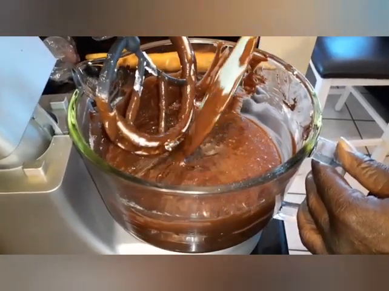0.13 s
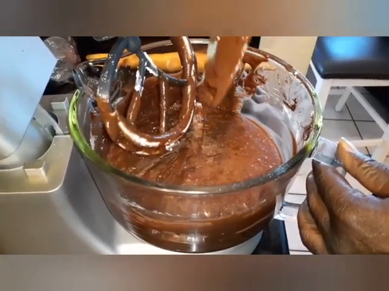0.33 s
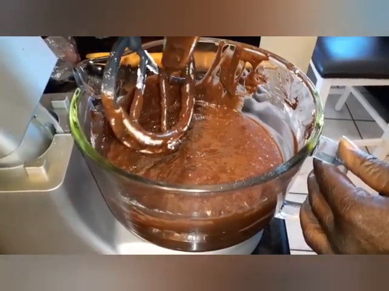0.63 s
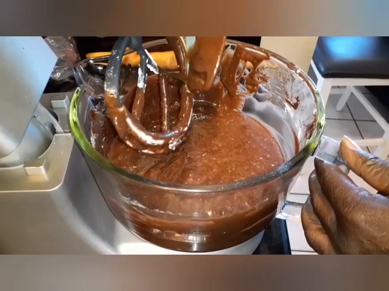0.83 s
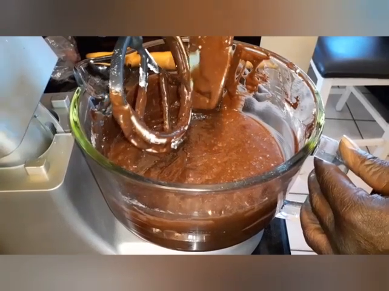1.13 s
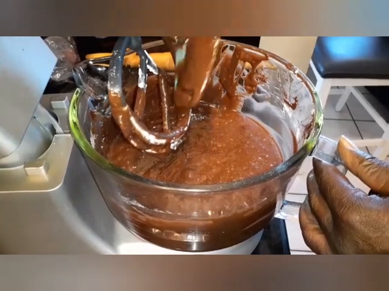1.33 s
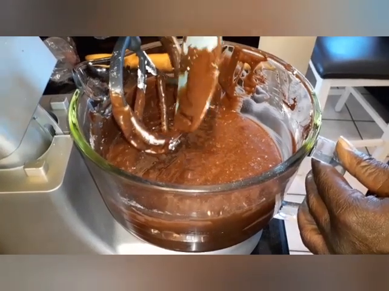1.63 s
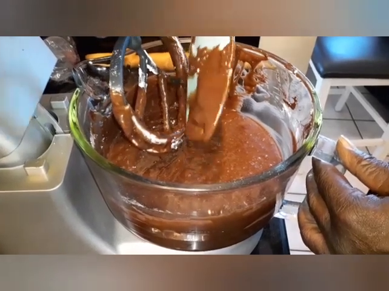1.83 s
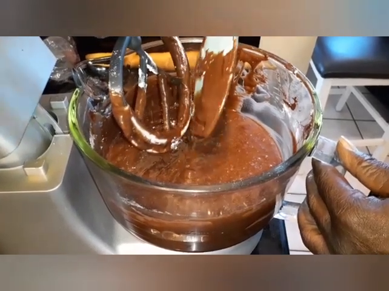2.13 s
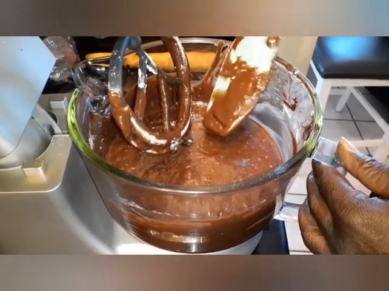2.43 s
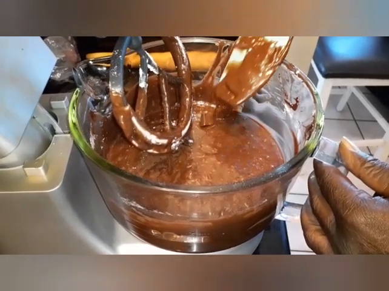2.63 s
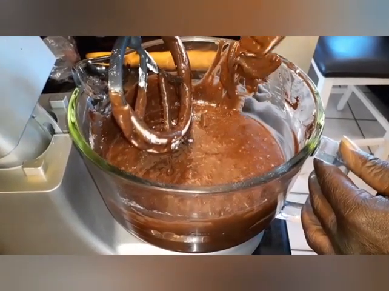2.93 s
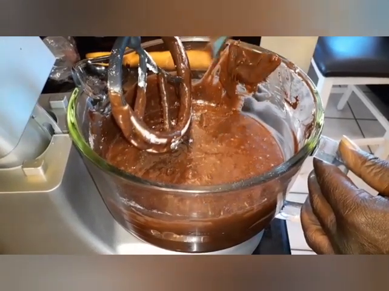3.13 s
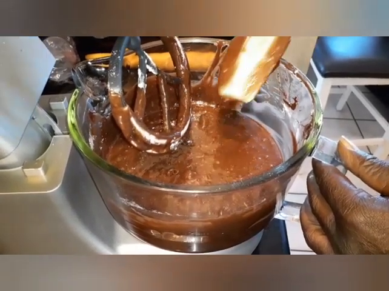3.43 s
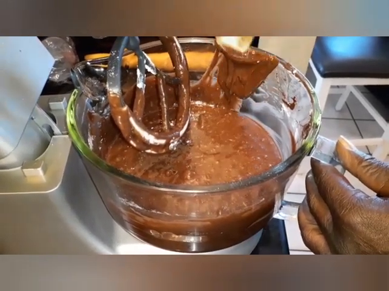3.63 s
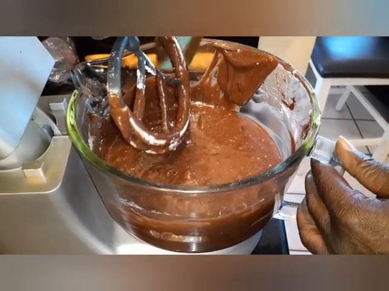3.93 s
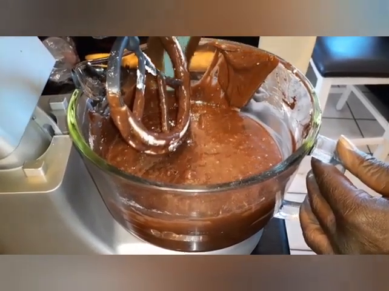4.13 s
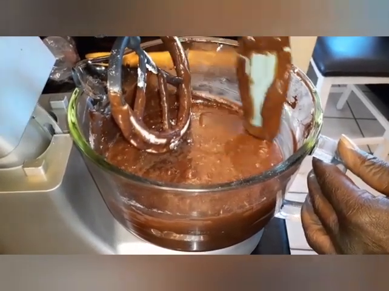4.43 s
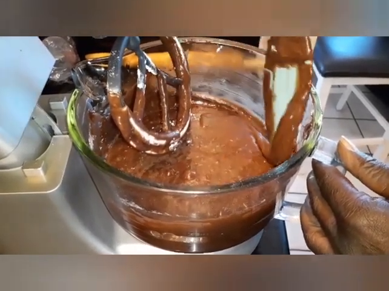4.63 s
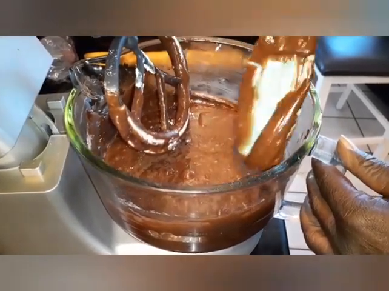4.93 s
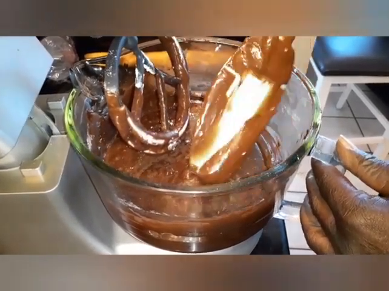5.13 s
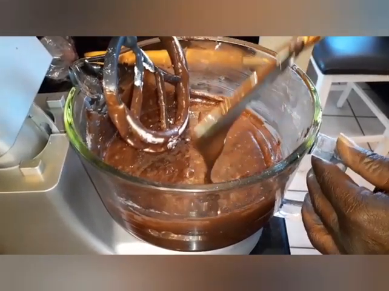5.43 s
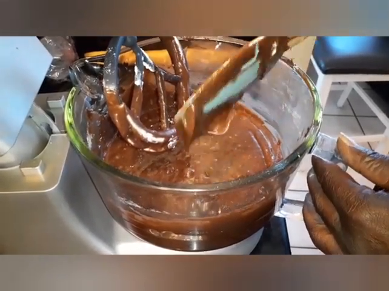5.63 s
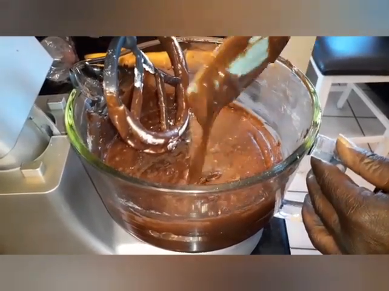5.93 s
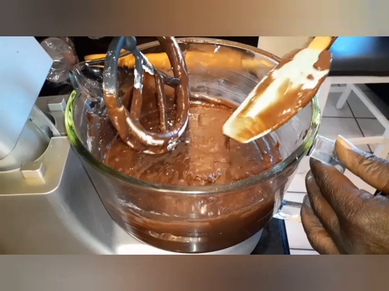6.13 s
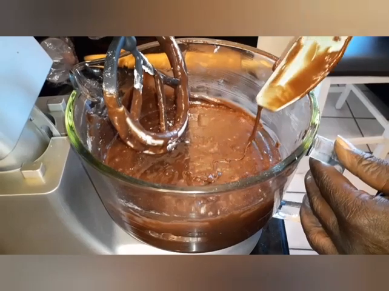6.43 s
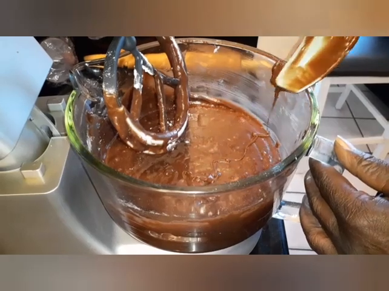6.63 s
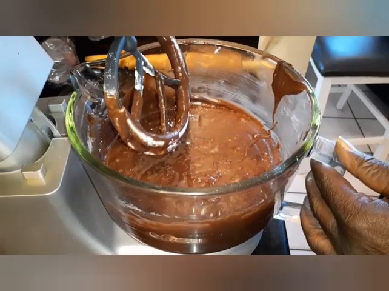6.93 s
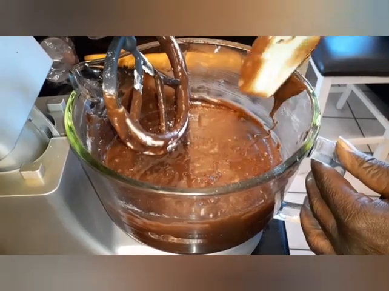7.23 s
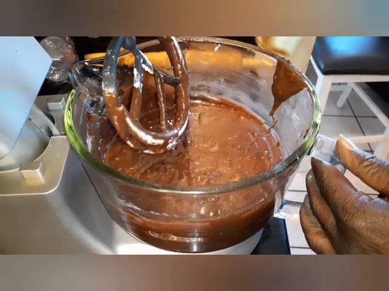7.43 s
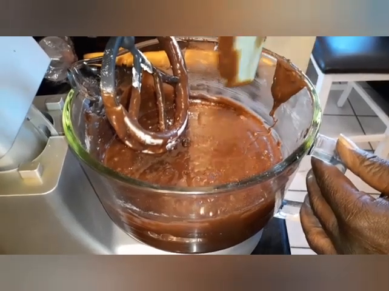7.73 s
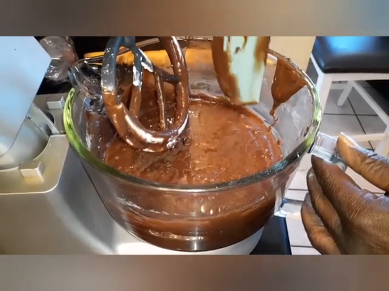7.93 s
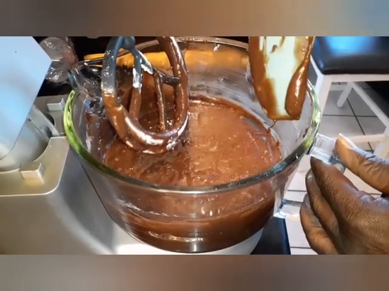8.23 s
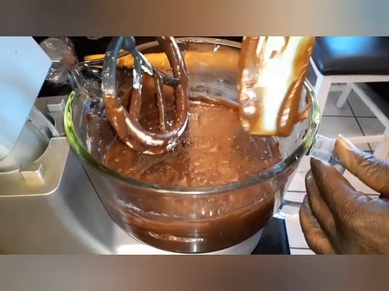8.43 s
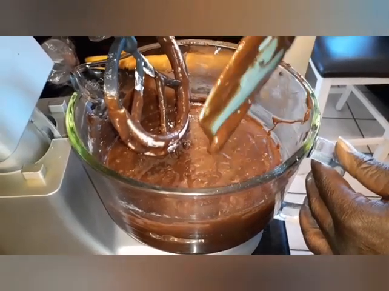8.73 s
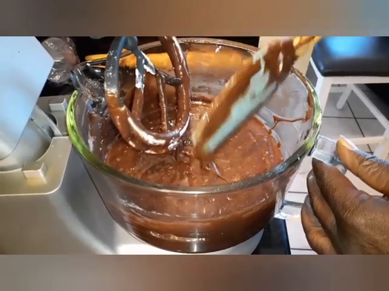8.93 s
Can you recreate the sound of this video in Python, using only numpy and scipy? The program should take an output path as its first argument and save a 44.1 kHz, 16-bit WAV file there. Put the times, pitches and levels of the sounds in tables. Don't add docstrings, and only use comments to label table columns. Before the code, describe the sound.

Wet sticky wiping and small clicks of batter on glass, light taps on a metal beater, then hard ringing knocks on the bowl's rim.

```python
import sys
import numpy as np
from scipy import signal
from scipy.fft import rfft, irfft
from scipy.io import wavfile

SR = 44100
rng = np.random.default_rng(int(sys.argv[2]) if len(sys.argv) > 2 else 0)


def wrap_up_sound(samples):
    columns = np.atleast_2d(samples).T
    tamed = np.clip(columns, -1, 1)
    steps = np.round(tamed * 32767).astype(np.int16)
    wavfile.write(sys.argv[1], SR, steps)


def natural_amplitude(level_db):
    exponent = np.asarray(level_db, float) / 20
    return 10 ** exponent


N = 400856


def rms_one(x):
    return x / np.sqrt(np.mean(x ** 2) + 1e-20)


def at_hz(points, hz):
    table = np.array(points)
    return np.interp(np.log(hz), np.log(table[:, 0]), table[:, 1])


def drift(rate):
    r = np.exp(-80 * np.pi * rate / SR)
    white = rng.standard_normal(N // 40 + 4002)
    slow = signal.lfilter([1], [1, -2 * r, r * r], white)[4000:]
    return np.interp(np.arange(N) / 40, np.arange(len(slow)), rms_one(slow))


def lean(db):
    return natural_amplitude(np.array([[db / 2], [-db / 2]]))


def band_pass(order, low_hz, high_hz, x):
    return signal.sosfilt(signal.butter(order, [low_hz, high_hz], "band", fs=SR, output="sos"), x)


def clicks(times, db):
    out = np.full(N, 1e-18)
    np.add.at(out, np.round(np.asarray(times) * SR).astype(int), natural_amplitude(db))
    return out


def dying(x, t60):
    return signal.lfilter([1], [1, -natural_amplitude(-60 / (t60 * SR))], x)


# f/Hz, likeness from -1 to 1
PAIR_LIKENESS = [(60, 0.9), (130, 1), (290, 0.98), (640, 0.31), (1410, -0.26), (3100, 0.0062), (6820, 0.16),
                 (15000, -1.7)]


def bands():
    edges = 22 * 2 ** np.arange(0, 10, .5)
    white = rng.standard_normal((2, 2, N))
    for k, (low, high) in enumerate(zip(edges, edges[1:])):
        mid, side = band_pass(2, low, high, white[k % 2])
        hz = np.sqrt(low * high)
        alike = np.clip(at_hz(PAIR_LIKENESS, hz), -1, 1)
        yield hz, np.sqrt(1 + alike) * mid + np.sqrt(1 - alike) * side * [[1], [-1]]


MOTOR_HZ = [60.05, 91.3, 120.1, 148.9, 211, 240.2, 269, 297.8, 389, 434, 480.4, 509, 600.5, 1189, 1357,
            1441]
# level/dB rms, left-right/dB
MOTOR_LEVELS = [(-64.5, 5), (-68.5, 4.5), (-54.5, 5.5), (-65, 8.5), (-70.5, 2.5), (-53.5, -2),
                (-62.5, 11.5), (-72, 2.5), (-69, 2.5), (-65, 9.5), (-72.5, 9.5), (-90.5, -7.5), (-71, 6.5),
                (-85.5, 3.5), (-80, 10.5), (-86, 10.5)]


def motor():
    t, out = np.arange(N) / SR, 0
    for hz, (db, lean_db) in zip(MOTOR_HZ, MOTOR_LEVELS):
        strength = np.sqrt(2) * natural_amplitude(db + 2.1 * drift(7.9))
        phase = 2 * np.pi * (hz * t + rng.random()) + 0.3 * drift(1.0)
        out = out + lean(lean_db) * strength * np.sin(phase)
    return out


# f/Hz, left-right/dB
AIR_LEAN = [(60, -3), (110, 7.5), (200, -2.5), (380, -4.5), (700, 9), (1290, 8), (2380, 12.5), (4400, 8),
            (8120, 1.5), (15000, 16)]
# f/Hz, level/dB per Hz
AIR_SPECTRUM = [(30, -30), (55, -6.5), (110, -11), (185, -13.5), (245, -12.5), (440, -8.5), (620, -13.5),
                (810, -23.5), (1400, -25.5), (2560, -28), (2860, -40), (9500, -39.5), (11500, -37),
                (15800, -39.5)]


def air(noise):
    out, together = 0, drift(4.9)
    for hz, band in noise:
        out = out + natural_amplitude(2.0 * together + 0.88 * drift(16)) * lean(at_hz(AIR_LEAN, hz)) * band
    bin_hz = np.arange(N // 2 + 1) * SR / N + 1
    shaped = irfft(rfft(out) * natural_amplitude(at_hz(AIR_SPECTRUM, bin_hz)), N)
    return natural_amplitude(-54) * rms_one(shaped)


# start t/s, length t/s, hiss level/dB, dull drag over hiss/dB, fine fizz over hiss/dB
STROKES = [(0.0, 0.64, -72, 3.5, -4), (0.424, 0.31, -98, 32.5, -11), (1.061, 0.26, -78, 10, -1),
           (1.914, 0.19, -81, 30, -35), (2.436, 0.17, -59, -14, -2), (2.54, 0.51, -73.5, 6, -7),
           (2.974, 0.14, -80.5, 24.5, -4), (3.06, 0.27, -73.5, 10.5, 1), (3.933, 0.43, -66.5, 1, 2),
           (4.173, 0.42, -64.5, -4, 1), (4.419, 0.16, -60, -0.5, 0), (4.559, 0.15, -54.5, -11, -4.5),
           (4.683, 0.31, -60, 0.5, 0), (4.89, 0.22, -62.5, -10, -3), (4.981, 0.74, -69.5, -11, -1.5),
           (5.354, 0.085, -65.5, -11.5, 6), (6.209, 0.85, -75.5, -22, -9), (7.192, 0.17, -64.5, -11, -1),
           (7.278, 0.94, -69.5, -14, -1), (7.487, 0.14, -71, 5, -2), (7.797, 1.63, -73, 6, -3.5),
           (8.8, 0.19, -56, 2, -1)]
# t/s, t60/s, hiss level/dB, drag over hiss/dB, fizz over hiss/dB
PEELS = [(0.681, 0.74, -65, 10.5, 3.5), (1.402, 0.19, -76, 20, 14), (1.69, 0.41, -68, 0, 3),
         (2.03, 1, -71, 12, 6), (2.245, 1.8, -66, -1, -1.5), (3.362, 2, -63, 1, 1),
         (5.872, 0.36, -49, 3, -10), (6.125, 0.75, -61.5, -8, 0.5), (7.91, 0.56, -66, 4.5, 0.5),
         (8.062, 0.26, -64, 2, 0), (8.17, 0.43, -69, -23, 4)]


def pressure():
    t, shapes = np.arange(N) / SR, []
    rise_share, edge = 0.35, 0.94
    for s, length, *_ in STROKES:
        shapes.append(np.interp(t, [s, s + rise_share * length, s + length], [0, 1, 0]) ** edge)
    peel_rise_s = 0.011
    for s, t60, *_ in PEELS:
        shapes.append(np.clip((t - s) / peel_rise_s, 0, 1) * natural_amplitude(-60 * np.maximum(t - s, 0) / t60))
    _, _, hiss_db, dull_db, fine_db = np.transpose(STROKES + PEELS)
    smear_db = 0.16 * dull_db
    return natural_amplitude(hiss_db + np.array([dull_db, smear_db, 0 * hiss_db, fine_db])) @ np.array(shapes)


def wiping():
    drag, smear, hiss, fizz = pressure()
    grains_per_s, grain_t60_s = 900, 0.0015
    grains = natural_amplitude(1.7 * np.minimum(rng.exponential(1, N), 5)) * (rng.random(N) < grains_per_s / SR)
    grainy = rng.standard_normal((2, N)) * (1 + 0.37 * dying(grains, grain_t60_s))
    # gain, low f/Hz, high f/Hz, left-right/dB
    ranges = ((drag, 450, 1700, 4), (smear, 1800, 4500, 4),
              (hiss, 4500, 6800, 3), (hiss, 6800, 10200, 3),
              (fizz, 10600, 13000, 9), (fizz, 12500, 16500, 10))
    out = 0
    for gain, low_hz, high_hz, lean_db in ranges:
        patches = natural_amplitude(0.74 * drift(26) + 1.0 * drift(29.0))
        out = out + gain * patches * lean(lean_db) * rms_one(band_pass(3, low_hz, high_hz, grainy))
    return out


# t/s, peak level/dB,
# pitch f/Hz, t60/s
TICKS = [(0.093, -48, 14500, 0.063), (0.1875, -51, 13770, 0.038), (0.675, -37, 11170, 0.059),
         (0.7282, -47, 12800, 0.027), (0.7741, -46.5, 13600, 0.27), (1.237, -49, 13700, 0.029),
         (1.5105, -52, 12000, 0.1), (1.694, -41, 14200, 0.059), (1.998, -41, 12600, 0.1),
         (2.4982, -37, 14400, 0.041), (2.638, -47, 14490, 0.035), (2.8005, -49, 14800, 0.035),
         (2.8973, -52, 13600, 0.035), (3.357, -46, 8650, 0.076), (3.5259, -47, 13100, 0.029),
         (3.5483, -44, 14850, 0.035), (3.6037, -47.5, 13400, 0.035), (4.8145, -38, 13600, 0.022),
         (6.1272, -50, 12800, 0.026), (7.259, -38.5, 12570, 0.052), (7.7844, -50, 12200, 0.035),
         (1.688, -45, 3700, 0.027), (1.69, -54, 6000, .05), (5.615, -31, 4800, .03),
         (1.4053, -46, 5600, .03), (1.9965, -48, 5600, .06), (2.024, -36, 2580, 0.045),
         (2.032, -35, 1900, .05), (2.2467, -45, 8000, .03), (2.2583, -42, 7300, .03),
         (2.4543, -43, 7900, 0.033), (4.4478, -51, 9000, .03), (4.5785, -51, 9000, 0.029),
         (7.252, -49, 3800, 0.073), (7.785, -54, 1503, .02), (1.9, -57, 1100, .03),
         (5.3848, -29, 5200, .015), (8.8626, -16.5, 5400, 0.038), (9.0145, -13, 5500, 0.017),
         (8.916, -19, 2000, .02), (8.9205, -30, 1500, .02), (5.442, -33, 8100, .03),
         (5.442, -40, 14000, .03), (5.616, -38, 8300, .02), (8.913, -43, 13000, .03),
         (5.443, -9, 2200, .02), (5.388, -15, 1530, .05), (8.861, -14, 1140, .04), (9.015, -23, 1130, .04),
         (2.119, -40, 1180, .04)]


def ticks():
    out, size = np.zeros((2, N + SR)), SR // 10
    for (s, db, hz, t60), white in zip(TICKS, rng.standard_normal((len(TICKS), 2, size))):
        burst = white * natural_amplitude(-60 * np.arange(size) / SR / max(t60, .005))
        burst = band_pass(1, hz * 0.94, min(hz * 1.2, 19000), burst)
        start = round(s * SR)
        out[:, start:start + size] += natural_amplitude(db + 0.5) * lean(8.8) * burst
    return out[:, :N]


# start t/s, end t/s, f/Hz, width f/Hz, level/dB
BRUSHES = [(0.451, 0.64, 2620, 1530, -57.5), (0.467, 0.62, 4300, 1400, -72),
           (0.783, 0.895, 7800, 395, -72.5), (0.802, 0.92, 2500, 2600, -64), (2, 2.22, 3800, 120, -76),
           (1.84, 1.87, 7000, 3000, -75), (2.372, 2.42, 13300, 4000, -64), (2.239, 2.355, 9300, 1600, -64),
           (2.244, 2.368, 6200, 2200, -66), (2.245, 2.31, 12900, 1800, -64), (2.452, 2.55, 7250, 2200, -58),
           (2.448, 2.52, 11400, 900, -57), (2.6, 2.83, 2090, 260, -63), (3.467, 3.6, 6500, 400, -76),
           (3.482, 3.533, 7800, 200, -72), (4.442, 4.525, 13100, 3200, -55), (4.446, 4.51, 5540, 1500, -62),
           (4.45, 4.5, 8200, 900, -62), (4.522, 4.58, 9000, 7000, -73), (4.585, 4.66, 4980, 1600, -59),
           (4.594, 4.66, 12800, 3600, -53.5), (5.437, 5.48, 2100, 600, -35.5),
           (5.612, 5.66, 2000, 700, -33.5), (5.794, 5.82, 2080, 900, -33), (5.875, 6.022, 8100, 833.3, -66),
           (5.88, 5.96, 13900, 2000, -61), (6.131, 6.202, 4920, 1200, -66), (6.174, 6.34, 6550, 120, -78),
           (7.515, 7.6, 14230, 698, -65), (7.52, 7.58, 12600, 700, -69), (7.52, 7.57, 6500, 500, -76),
           (7.65, 7.699, 5450, 496, -72), (7.655, 7.71, 12500, 3570, -67), (7.83, 7.94, 12500, 4000, -66.5),
           (8.815, 8.875, 2500, 534, -57), (8.911, 8.95, 2190, 530, -33), (8.91, 8.94, 4000, 200, -48),
           (9.063, 9.1, 2200, 500, -38)]
# start t/s, time where the touch would end t/s, f/Hz, width f/Hz, #
# level/dB; an end before the start holds the first faint contact
MORE_BRUSHES = [
    (2.13, 1.8, 6620, 120, -70),
    (2.6, 2.23, 11000, 150, -69),
    (2.13, 2.19, 13000, 400, -72),
    (8.6, 8.0, 2300, 500, -57),
    (7.87, 7.97, 1450, 300, -65),
    (3.2, 3.09, 870, 500, -57),
    (7.24, 7.3, 4200, 640, -62),
]
# start t/s, end t/s, level/dB
RUBS = [
    (2.237, 2.35, -70.5),
    (2.455, 2.557, -75),
]
# f/Hz, width f/Hz, level/dB
WIRES = [(4090, 90, -6), (5450, 65, -2), (5840, 55, -3), (6180, 150, 1), (6500, 89, -3), (7700, 60, 0),
         (8200, 100, -6), (8610, 70, -8), (9000, 90, -3), (9200, 110, -8), (11500, 150, -7),
         (12450, 70, -4), (12950, 70, -1), (14300, 150, -6)]


def wires():
    out, size = np.zeros((2, N + SR)), SR // 3
    rows = BRUSHES + MORE_BRUSHES
    for a, b, db in RUBS:
        rows = rows + [(a, b, hz, width_hz, db + wire_db) for hz, width_hz, wire_db in WIRES]
    for (a, b, hz, width_hz, db), white in zip(rows, rng.standard_normal((len(rows), 2, size))):
        song = rms_one(band_pass(2, hz - width_hz / 2, hz + width_hz / 2, white))
        touch = np.interp(np.arange(size) / SR / (b - a), [0, .15, .6, 1, 1.4], [.2, 1, .8, .1, 0])
        start, lean_db = round(a * SR), 6.0 + 10.7 * (hz > 5000)
        out[:, start:start + size] += natural_amplitude(db) * touch * lean(lean_db) * song
    return out[:, :N]


def chatter(rows, contact_s, count):
    rows = np.array(rows, float)
    chance = rng.random((len(rows), count, 2))
    bounce = np.arange(count) > 0
    late = chance[..., 0] * bounce
    touches = np.repeat(rows[:, None], count, axis=1)
    touches[..., 0] += late * contact_s[:, None]
    touches[..., 1] -= (10.0 * late + 8.6 * chance[..., 1]) * bounce
    return touches.reshape(-1, rows.shape[1]).T


# t/s, peak level/dB, thud/dB, crack/dB, brightness/dB per octave
TAPS = [(0.694, -40, 1, -24, -3), (0.806, -49, 1, -12.5, 2), (1.406, -32, -2, -21, 1),
        (1.506, -49.5, -12, -43, 9.5), (1.695, -43, 8.5, -30.5, -10), (1.901, -59.5, 13, -30, -13),
        (2.002, -23.5, -22, -40.5, -9), (2.026, -40.5, 12, -23, -4), (2.117, -52, -13, -35, -5),
        (2.49, -61, 25.5, -16, -6), (3.393, -51, 23, -21.5, -10)]


def tap_touches():
    db = np.array(TAPS)[:, 1]
    hardest_contact_s, doubles_every_db = 0.0088, 17.5
    return chatter(TAPS, hardest_contact_s * 2 ** ((np.max(db) - db) / doubles_every_db), count=5)


def struck(times, blow_db, modes, contact_hz, spread_db, colour_db=lambda k, hz: 0, count=2):
    out = np.zeros((2, N))
    chance = rng.standard_normal((len(times), len(modes)))
    soft = np.exp(-2 * np.pi * contact_hz / SR)
    first = int(min(times) * SR) - 1
    for k, (hz, db, t60, lean_db, lead) in enumerate(modes):
        sign = (-1) ** (k // count)
        push = sign * clicks(times, blow_db + db + colour_db(k, hz) + spread_db * chance[:, k])[first:]
        ring = natural_amplitude(-60 / (t60 * SR)) * np.exp(2j * np.pi * hz / SR)
        swing = signal.lfilter([(1 - soft) ** 2], np.poly([soft, soft, ring]), push)
        pair = lean(lean_db) * np.exp(.5j * lead * np.array([[1], [-1]]))
        rest = np.exp(-1j * np.angle(pair.sum()))
        out[:, first:] += np.imag(swing * pair * rest)
    return out


# f/Hz, level/dB, t60/s, left-right/dB, left lead/rad
BEATER_MODES = [(245, 6, 0.055, 4, -0.5), (550, -9, 0.13, 0, -2.5), (716, -13, 0.09, 5, -2),
                (940, -5, 0.049, 7, 5.5), (1000, -1, 0.082, -16, -8.5), (2280, -11, 0.052, 3, 2.5),
                (1059, 3.5, 0.071, 10, 1), (1128, 3.5, 0.068, -8, 1.5), (1235, 0, 0.03, 7, 1.5),
                (1630, -5, 0.061, 13, 8), (1890, -9, 0.078, 7, -2)]


def beater(taps):
    return struck(taps[0], taps[1] - 6, BEATER_MODES, contact_hz=2500, spread_db=0.26)


# f/Hz, level/dB, t60/s, left-right/dB, left lead/rad
COUNTER_MODES = [(50, -19.5, 0.47, 3.5, 0), (107.5, -6, 0.14, 6, -0.17), (145.2, -3.5, 0.26, 1.9, -0.53),
                 (261, -5, 0.1, 2, -0.0019), (348, -1.5, 0.14, 1.7, 0.05), (435.5, -2.5, 0.089, 1, 0.66)]


def counter(blows):
    s, db, thud_db, *_ = blows
    thud = struck(s, db + thud_db + 0.5, COUNTER_MODES, contact_hz=200, spread_db=3.0, count=1)
    thud = signal.sosfilt(signal.butter(2, 48, "high", fs=SR, output="sos"), thud)
    return signal.lfilter(*signal.iirnotch(195, 4.5, fs=SR), thud)


# f/Hz, width f/Hz
BOWL_GAPS = [(2020, 210), (2500, 220), (4150, 460)]


def hollow(x):
    for hz, width_hz in BOWL_GAPS:
        x = 0.32 * x + 0.56 * signal.lfilter(*signal.iirnotch(hz, hz / width_hz, fs=SR), x)
    return x


# f/Hz, level/dB per Hz
CRACK_SPECTRUM = [(190, -41), (270, -13), (633, -3.5), (947, -18), (1300, 1.5), (1980, -8.5), (3410, -10),
                  (8180, -25.5), (14300, -35), (16500, -56)]
# f/Hz, t60/s
ROOM_T60 = [(250, 0.23), (1000, 0.39), (4000, 0.56), (14000, 0.1)]
# f/Hz, left-right/dB
BOWL_LEAN = [(60, 5), (180, 9), (550, 3.5), (1650, 5.5), (4970, 1), (15000, 11)]


def crack(blows, noise):
    s, db, _, crack_db, bright = blows
    out = 0
    for hz, band in noise:
        colour_db = at_hz(CRACK_SPECTRUM, hz) + bright * np.log2(min(hz, 7500) / 5000)
        hit = clicks(s, db + crack_db + 19 + colour_db)
        burst, rattle = dying(hit, 0.029), natural_amplitude(-12.5) * dying(hit, 0.12)
        tail = natural_amplitude(-19.0) * dying(hit, at_hz(ROOM_T60, hz))
        shape = signal.lfilter([.06], [1, -.94], burst + rattle + tail)
        out = out + shape * lean(at_hz(BOWL_LEAN, hz)) * band
    return hollow(out)


def room(x):
    t, t60_s = np.arange(SR // 2) / SR, .4
    echoes = rng.standard_normal((2, len(t))) * natural_amplitude(-60 * t / t60_s) * (t > .004)
    return signal.fftconvolve(x, echoes / np.sqrt(np.sum(echoes[0] ** 2)), axes=1)[:, :N]


# t/s, peak level/dB, thud/dB, crack/dB, brightness/dB per octave
HELD_KNOCKS = [
    (5.385, -10, -10, -27, 1.5),
    (5.44, -19.5, -13, -15.5, -3),
    (8.861, -7.5, -8.5, -20.5, 1.5),
    (8.913, -21.5, 5, -15, -0.5),
    (9.014, -6, -9.5, -18.5, -0.5),
    (9.07, -24, 0, -20, -5.5),
]
FREE_KNOCKS = [
    (5.556, -6.5, -13, -10, 2.5),
    (5.613, -23, -11, -11.5, -1.5),
    (5.731, -7.5, -11.5, -8, 1),
    (5.788, -26.5, -34, -14, -3.5),
]


def knock_touches(knocks):
    return chatter(knocks, np.tile([0, .014], len(knocks) // 2), count=3)


RIM_HZ = [313, 565, 694, 800, 947, 1000, 1071, 1206, 1265, 1330, 1421, 1550, 1700, 1775, 2132, 2281, 2700,
          3085, 3377, 3612, 3790, 1340, 2264, 3472]
# level/dB, t60/s, left-right/dB, left lead/rad
RIM_RINGS = [(-14, 0.1, 0.5, -1.5), (-10, 0.14, -3.5, 0.5), (-17.5, 0.15, 12.5, 0.5), (-9.5, 0.08, 3, 1.5),
             (-20.5, 0.29, 2.5, 5), (-9.5, 0.1, 1.5, 3), (-20, .1, -0.5, 6.5), (-2, 0.045, 3.5, 2.1),
             (3, 0.14, 7.5, 3.5), (-0.5, 0.18, 1, 2), (-1.5, 0.06, 5.5, 2.5), (-7.5, 0.07, 3.5, -2.5),
             (-3.5, 0.063, 7.5, 1.5), (-16.5, 0.085, -1, 3), (-21.5, 0.32, 5.5, 1.5), (-15, 0.27, 3, 0),
             (-23.5, 0.094, 2.5, 6), (-21, 0.15, 3.5, 8.5), (-20, 0.1, 2, 0.5), (-26.5, 0.17, 5.5, 3),
             (-34.5, .12, -7.5, 5.5), (-15.5, 0.59, 4.5, 3.5), (-20, 0.12, 1.5, 1.5), (-21, 0.24, 2, 3)]


def rim(knocks, ring_share, change_db):
    s, db, _, _, bright = knocks
    modes = []
    for hz, (level_db, t60, *pair) in zip(RIM_HZ, RIM_RINGS):
        modes.append((hz, level_db, t60 * ring_share ** (hz / 1300) ** 0.29, *pair))

    def colour_db(k, hz):
        return change_db[k] + 3.6 * bright * max(np.log2(hz / 1500), 0)

    skid_db = np.tile(np.repeat([0, -5.0], 3), len(s) // 6)
    return struck(s, db + skid_db - 10.0, modes, contact_hz=4050, spread_db=1.76, colour_db=colour_db)


HELD_CHANGE = [6, 5.5, 8.5, 0, 2, -0.5, 4.5, 6.5, 0, -2, 2, -7, 1, 0, -2.5, -5, -7.5, -5.5, -6.5, -4, -6,
               -10, -3.5, -2]


def scene():
    free, held, taps = knock_touches(FREE_KNOCKS), knock_touches(HELD_KNOCKS), tap_touches()
    blows = np.hstack([free, held, taps])
    noise = list(bands())
    kitchen = motor() + air(noise)
    blade = wiping() + ticks() + wires()
    metal, thud = beater(taps), counter(blows)
    glass = rim(free, 0.94, np.zeros(len(RIM_RINGS))) + rim(held, 0.75, HELD_CHANGE)
    echo = natural_amplitude(-8.5) * room(glass + 0.6 * metal + 0.81 * thud)
    return kitchen + blade + metal + thud + crack(blows, noise) + glass + echo


def gain_control(x):
    loud_db, rest_db, duck_db = -14, -1.38, -5
    hold_s, recover_s, settle_s = 1.07, 0.3, 1
    loud = np.flatnonzero(np.abs(x).max(axis=0) > natural_amplitude(loud_db))
    now = np.arange(N)
    since = now - np.concatenate([[-N], loud])[np.searchsorted(loud, now, side="right")]
    held = np.clip(1 - (since / SR - hold_s) / recover_s, 0, 1)
    settling = dying(held > 0, settle_s * np.log(1000)) / (settle_s * SR)
    return natural_amplitude(rest_db + duck_db * held * settling) * x


def band_limit(x):
    return signal.sosfilt(signal.butter(12, 16790, fs=SR, output="sos"), x)


def record(dry):
    low_cut = signal.sosfilt(signal.butter(4, 42, "high", fs=SR, output="sos"), dry)
    top_cut = signal.sosfilt(signal.cheby2(16, 42, 15880, fs=SR, output="sos"), low_cut)
    return band_limit(np.clip(gain_control(top_cut), -1, 1))


dry = scene()
out = record(dry)
wrap_up_sound(out)
```